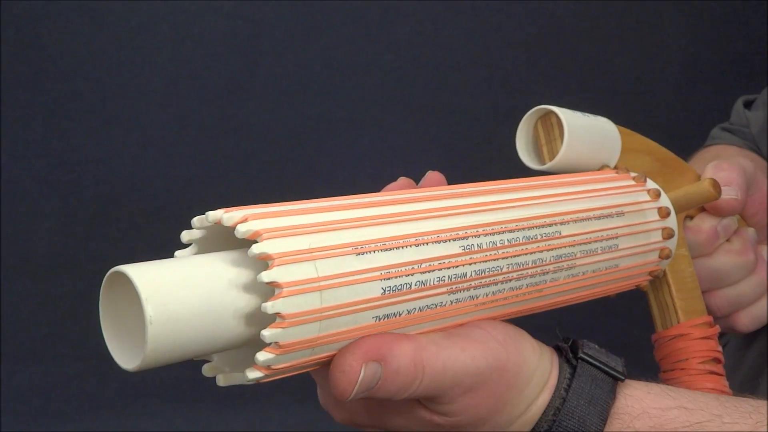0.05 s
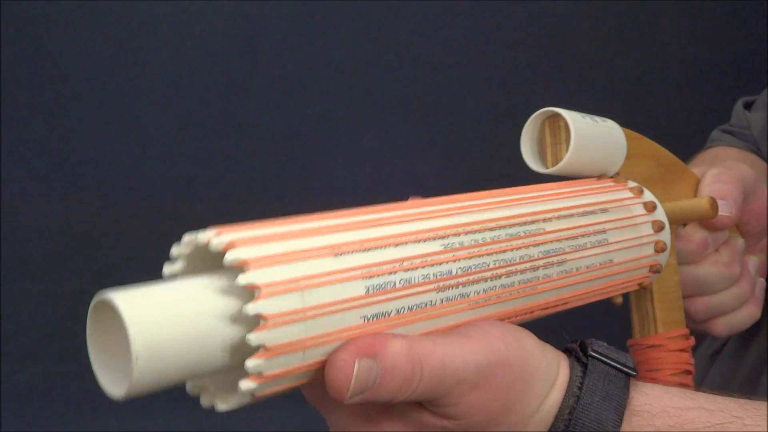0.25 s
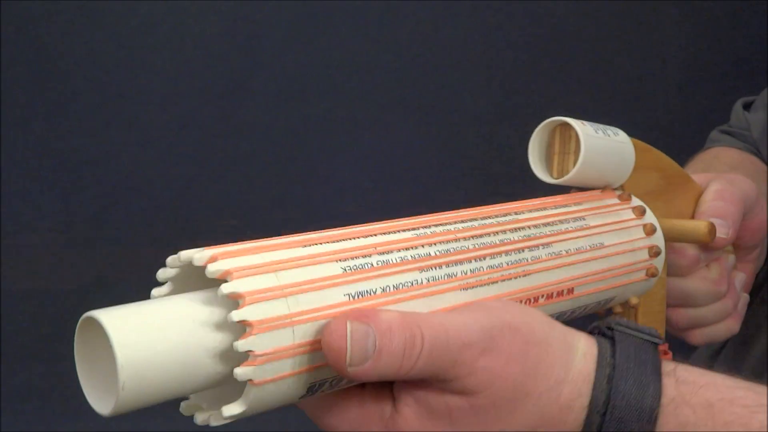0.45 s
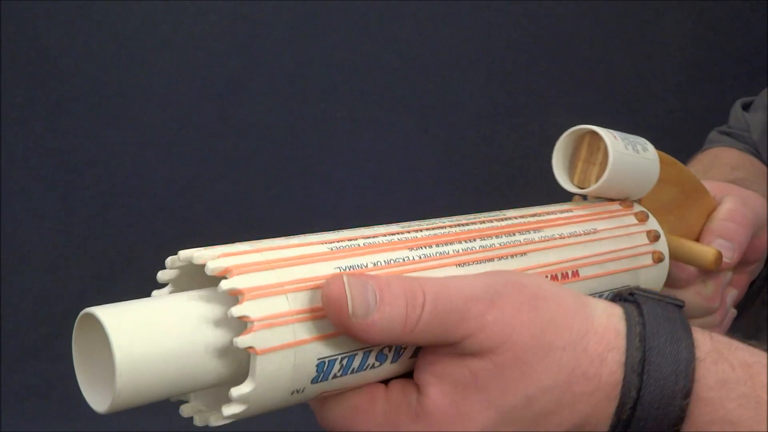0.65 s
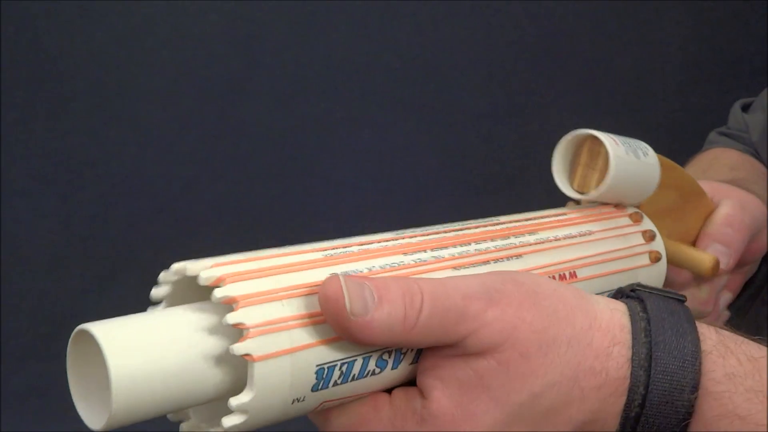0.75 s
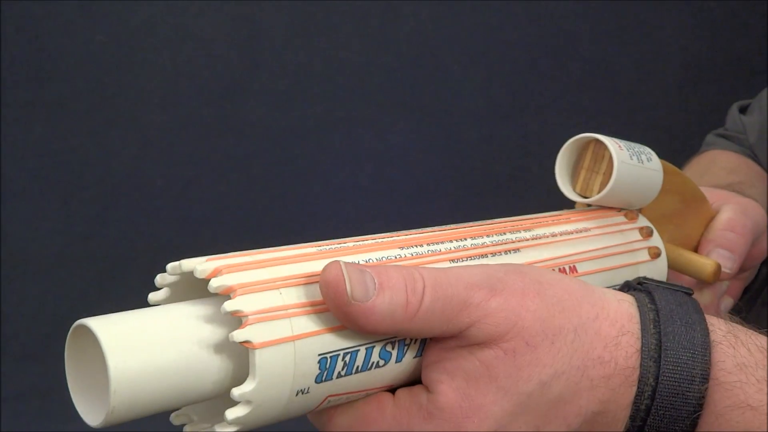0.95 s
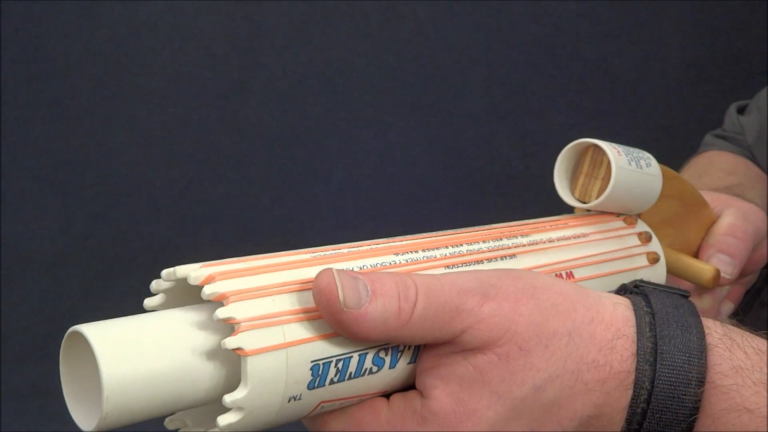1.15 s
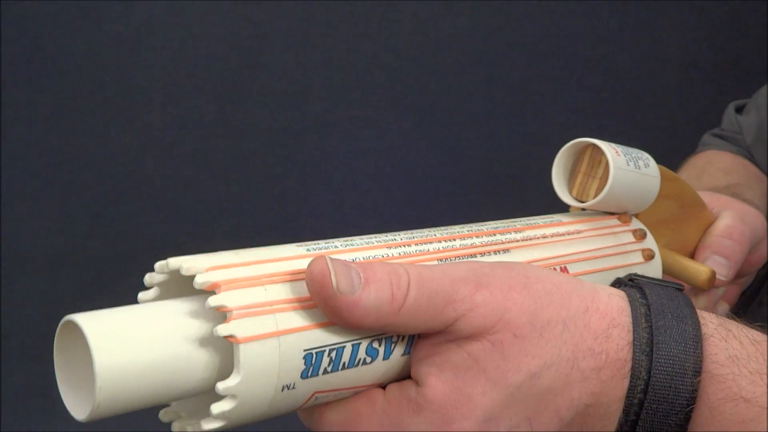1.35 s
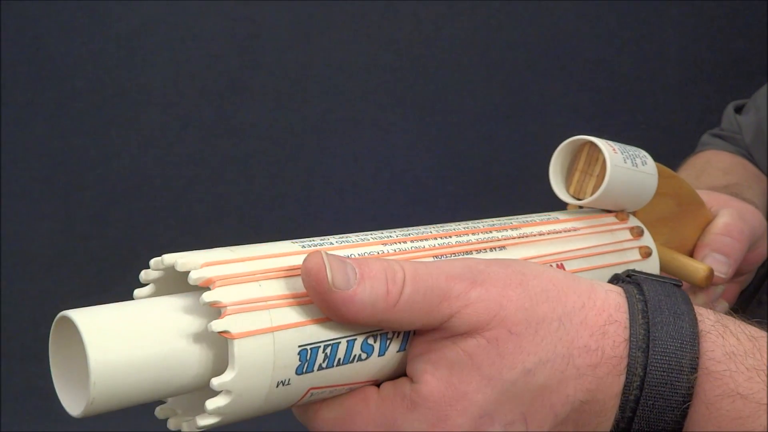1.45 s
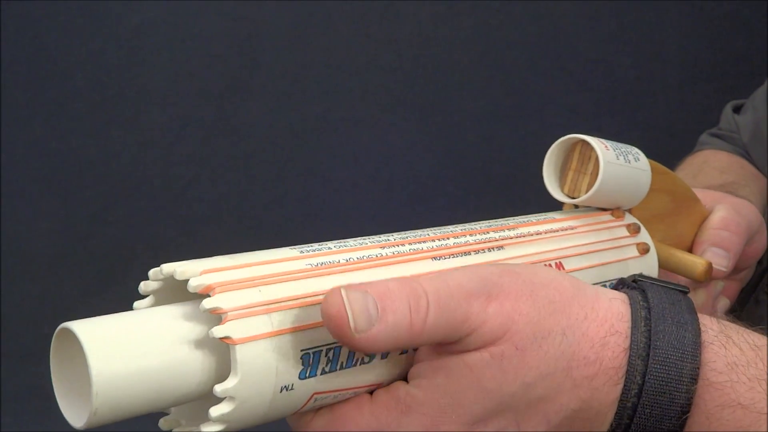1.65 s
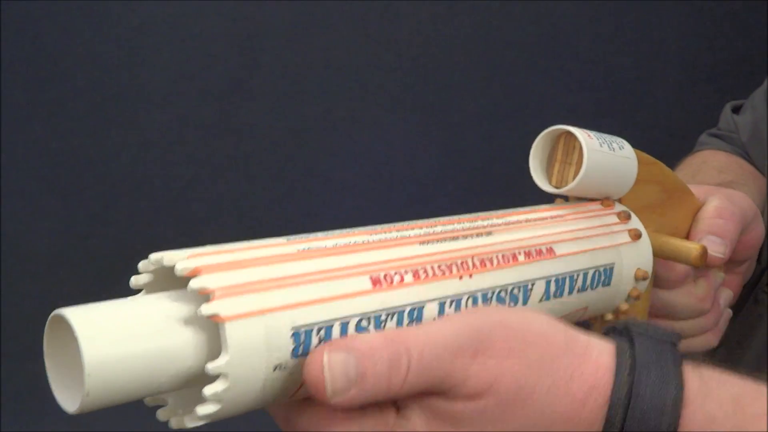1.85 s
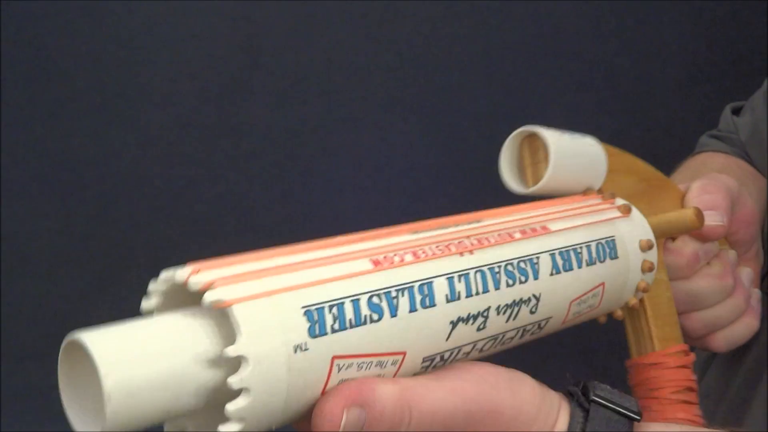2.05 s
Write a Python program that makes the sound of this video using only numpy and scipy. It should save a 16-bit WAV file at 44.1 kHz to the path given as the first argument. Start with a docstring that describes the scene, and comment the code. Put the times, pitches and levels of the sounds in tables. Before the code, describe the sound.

A toy gun fires five rubber bands between 0.2 and 0.7 seconds, each a sharp snap with a short fizzy tail, mixed with barrel clicks and soft slaps. Bands land with hollow knocks at about 0.85 and 1 second. A sixth snaps at 1.3 seconds and knocks at 1.5. Two light ticks and a faint hand rub follow around 1.7 to 1.8 seconds. The small room hums faintly throughout.

```python
"""A toy gun with a hand-twisted barrel lets go six rubber bands in a small, hard room whose air hums faintly.
First the pins tick past the catch and a hand rubs the barrel. Five bands snap off in quick succession, each
with a near echo and a swelling, fizzy tail, while soft things are slapped. From 0.85 s bands land on hard
things across the room with hollow knocks. The sixth leaves at 1.3 s; a knock, two ticks and a rub follow."""
import sys
import numpy as np
from scipy import signal
from scipy.fft import rfft, irfft, next_fast_len
from scipy.io import wavfile
from scipy.ndimage import uniform_filter1d

SR = 44100
rng = np.random.default_rng(int(sys.argv[2]) if len(sys.argv) > 2 else 0)


def generate_wav(signal):
    """Clip the signal to [-1, 1] and save it as 16-bit WAV at the path in sys.argv[1]."""
    frames = np.transpose(np.atleast_2d(signal))
    scaled = np.clip(frames, -1, 1) * 32767
    pcm = np.round(scaled).astype(np.int16)
    wavfile.write(sys.argv[1], SR, pcm)


N = 92610
T = np.arange(int(.8 * SR)) / SR  # seconds within one event

# Spectra of the sources. Each row: frequency in Hz, relative level in dB.
AIR_SPECTRUM = [(15, -37), (25, -9.5), (118, -9.5), (212, -8.5), (235, -7), (336, -4.5), (372, -10),
                (433, -3.5), (685, -15), (884, -5), (1110, -11), (1550, -12), (1670, -10), (3320, -21),
                (11000, -30), (14300, -70), (22000, -120)]
TICK_SPECTRUM = [(1000, -17), (2300, -21), (2850, -0.5), (3400, 1), (4500, -3), (5800, -1), (8000, -4.5),
                 (10500, -8.5)]
RUB_SPECTRUM = [(300, -4), (2000, -7), (3800, 3), (6000, -4.5), (11000, -12)]
RECOIL_SPECTRUM = [(20, -22), (45, -6), (90, -19), (190, -3), (300, -37), (1500, -71)]
TAIL_SPECTRUM = [(59, -44), (100, -24), (273, -18.5), (404, -13), (648, -17.5), (998, -12), (1260, -15),
                 (1700, -13.5), (2110, -13.5), (2470, -11), (3310, 0), (3800, -8.5), (4280, -1.5),
                 (4820, -1.5), (5750, -7.5), (7420, -2), (8690, -4), (10400, 0), (11000, -2), (14300, -28),
                 (22000, -120)]
SLAP_SPECTRUM = [(100, -6.5), (350, 0), (1000, 5), (2100, 3.5), (3500, 2), (11000, -16)]
CLATTER_SPECTRA = [
    [(150, -22), (380, 0), (520, -9.5), (720, 6.5), (1000, -4), (1500, -10), (3100, -12), (7000, -16),
     (11000, -37)],
    [(88, -78), (150, -37), (598, -3.5), (743, -1), (972, -19), (1210, -9.5), (2390, -10), (2610, -13.5),
     (2810, -3), (3480, -3.5), (11000, -22), (14300, -58), (22000, -120)],
    [(150, -20), (580, -20.5), (900, -1), (1150, -7.5), (1400, -10), (1800, -9.5), (2800, -14), (4800, -10),
     (7500, -16.5), (11000, -17.5)],
]  # one per hard landing
# Sharp clicks: pins passing the catch and, at 0.85 s, a band striking something hard. Each row: start
# in seconds, level in dB, room in dB re tick, tilt in dB per octave, ping in dB re tick.
SHARP_TICKS = [(0.1366, -42, -11, -7, -19), (0.2066, -19, -10, -2, 4.5), (.3203, -20.5, -17, -8, -12),
               (.3230, -15, -17.5, 2, -12), (.4208, -14.5, -15, -2, 0), (.533, -22, -8, -9, -7),
               (.633, -24, -10, -2, -10), (0.8077, -23.5, -9.5, -4, -2), (0.8513, -25, -11.5, -0.5, -16),
               (1.6755, -30, -14, 11, -12), (1.716, -44.5, -16, 0, -14)]
# Strokes of the hand. Each row: peak time in seconds, level in dB, width in seconds.
HAND_RUBS = [(0.208, -33.5, 0.012), (0.974, -45, 0.0097), (1.006, -42, 0.0096), (1.298, -49.5, 0.0095),
             (1.804, -53, .025)]
# Bands let go. Each row: start in seconds, snap in dB, echo in dB re snap, echo delay in seconds,
# tail in dB, tail build-up in seconds, recoil in dB, tilt in dB per octave.
RELEASES = [(0.2303, -17, 1.5, 0.0049, -11.5, 0.017, -62, -1),
            (0.3427, -14, -2, 0.0047, -12.5, 0.018, -51, 5), (0.4608, -12, -8, 0.0054, -12, 0.021, -59, -4),
            (0.5614, -14.5, 2, 0.0054, -12.5, 0.016, -57, 1.5),
            (0.6845, -13.5, -8, .0054, -13, 0.021, -57, 1),
            (1.3238, -16, 2, 0.0061, -12.5, 0.017, -52, 2.5)]
# Resonances of pins and barrel. Each row: frequency in Hz, bandwidth in Hz, level in dB.
BARREL_MODES = [(3210, 430, 3.5), (4800, 940, -2.5), (6930, 1400, -6.5), (7530, 800, -1.5),
                (10570, 500, 1.5)]
# Narrow resonances of the tube. Each row: frequency in Hz, relative level in dB.
TUBE_MODES = [(2987, -2.5), (3140, 2), (3315, 0.5), (3362, -8), (3462, -2), (3638, -7), (4397, -9),
              (4428, -3), (4515, -13), (4679, 2.5), (7181, -9), (10535, -5)]
# Bands hitting soft things. Each row: start in seconds, level in dB, rise in seconds.
SOFT_HITS = [(0.342, -30, 0.0019), (.385, -30.5, 0.0036), (.728, -26, 0.01), (.96, -38, 0.0095)]
# Bands hitting hard things. Each row: start in seconds, ring in dB, clatter in dB,
# clatter rise in seconds, clatter T60 in seconds.
HARD_HITS = [(0.8509, -26, -24.5, 0.007, 0.25), (1.0235, -39.5, -26.5, 0.0027, 0.26),
             (1.5018, -28, -21, .001, 0.25)]
# Modes of each hard thing. Each row: frequency in Hz, relative level in dB, T60 in seconds.
STRUCK_MODES = [
    [(362.6, -10.5, 0.28), (408, -9.5, 0.23), (669, -6.5, 0.2), (725, -8.5, 0.4), (800, 10, 0.028),
     (842, 0.5, 0.067), (963, -10.5, 0.24)],
    [(510, -5, 0.47), (590, -1.5, 0.38), (690, -22, 0.45), (755, -3.5, 0.3), (1157, -9, 0.44),
     (2810, -2, .25), (2980, -8, 0.27), (3300, -1, 0.32)],
    [(189, -8.5, 0.65), (684, -12.5, 0.4), (874, -3.5, 0.29), (926, -5.5, 0.29), (1067, -13, 0.54),
     (1109, -0.5, 0.28), (1770, -1.5, 0.18), (2127, -8, 0.28), (2360, 2, 0.073)],
]
# Reverberation of the room. Each row: frequency in Hz, T60 in seconds.
ROOM_T60 = [(200, 0.58), (1000, 0.57), (3300, 0.37), (6000, 0.32), (10500, 0.22)]
# Likeness of left and right. Each row: frequency in Hz, coherence from 0 to 1.
COHERENCE = [(40, 0.9), (120, .9), (300, 0.55), (600, 0.65), (1200, 0.61), (4000, 0.73), (10000, 0.69)]

AIR_DB, TOP_HZ = -49.5, 11080
TICK_HOLD_S, TICK_FALL_S, TICK_ECHO_S, TICK_ECHO_DB = 0.001, 0.00049, 0.0047, -12
PING_HZ, PING_T60_S = 3260, 0.016
SNAP_HOLD_S, ECHO_HOLD_S, SNAP_LOW_HZ = 0.0011, 0.0006, 2800
TUBE_DB, TUBE_T60_S = -20, 0.35
SWELL_DB, SWELL_SHAPE, TAIL_ONSET_S = 11, 1.24, 0.009
RING_RISE_CYCLES = 1.3
GUN_PAN_DB, TAIL_PAN_DB, LANDING_PAN_DB = -0.7, 0.14, 0.5  # left gain, right the opposite


def amp(db):
    """Amplitude ratio of a level in decibels."""
    return 10 ** (np.asarray(db) / 20)


def unit(x):
    """Normalisation to rms 1."""
    return x / np.sqrt(np.mean(x ** 2) + 1e-20)


def along(points, hz):
    """Interpolation of (Hz, value) points on a logarithmic frequency axis."""
    freqs, values = np.transpose(points)
    return np.interp(np.log(hz + 1), np.log(freqs + 1), values)


def filtered(x, response):
    """Linear filtering: the spectrum is multiplied by a frequency response."""
    n = x.shape[-1]
    padded = next_fast_len(n + 8192)
    return irfft(rfft(x, padded) * response(np.fft.rfftfreq(padded, 1 / SR)), padded)[..., :n]


def add(out, start, x, pan_db=0):
    """Superposition: x joins the track at start seconds, placed by a level difference."""
    i = max(round(start * SR), 0)
    out[:, i:i + x.shape[-1]] += (x * amp([[pan_db], [-pan_db]]))[:, :N - i]


def noise(spectrum, size, grain_db=0, side_db=0):
    """Partly coherent stereo noise of rms 1; amplitude modulation gives it millisecond grains."""
    def response(hz):
        angle = np.arccos(np.clip(along(COHERENCE, hz), 0, .999)) / 2
        return amp(along(spectrum, hz)) * [np.cos(angle), amp(side_db) * np.sin(angle)]

    grains = unit(uniform_filter1d(rng.standard_normal(size), size=40))
    mid, side = filtered(rng.standard_normal((2, size)) * amp(grain_db * grains), response)
    return unit(np.array([mid + side, mid - side]))


def fade(t60):
    """Exponential decay, 60 dB in t60 seconds."""
    return np.exp(-np.log(1000) * T / t60)


def rise(seconds):
    """Exponential approach to 1 with the given time constant."""
    return 1 - np.exp(-T / seconds)


def ring(hz, t60):
    """Free vibration of one damped mode, its random phase a little different at each ear."""
    phase = rng.uniform(0, 2 * np.pi) + rng.normal(0, 0.21, (2, 1))
    return np.sin(2 * np.pi * hz * T + phase) * fade(t60)


def room_air():
    """Stationary noise, strongest at low frequencies, is heard as a faint hum."""
    return amp(AIR_DB) * noise(AIR_SPECTRUM, N)


def slip(hold_s, fall_s, side_db):
    """Slipping contact excites with a brief train of equal kicks of random sign."""
    mid, side = np.sign(rng.standard_normal((2, len(T)))) * amp([[0], [side_db]])
    envelope = rise(0.00018) * np.exp(-np.maximum(T - hold_s, 0) / fall_s)
    return envelope * np.array([mid + side, mid - side])


def click(x, tilt_db):
    """Spectral tilt in dB per octave sets brightness; the energy is that of rms 1 over 2 ms."""
    x = filtered(x, lambda hz: amp(tilt_db * np.log2(np.clip(hz, 2500, TOP_HZ) / 5000)) * (hz < TOP_HZ))
    return x / np.sqrt(np.sum(x ** 2) / (2 * .002 * SR))


def ticks():
    """Impulsive excitation: a light contact clicks and pings, with a weak echo and a little room."""
    out = np.zeros((2, N))
    for start, db, room_db, tilt_db, ping_db in SHARP_TICKS:
        kicks = slip(TICK_HOLD_S, TICK_FALL_S, side_db=-14)
        contact = filtered(kicks, lambda hz: amp(along(TICK_SPECTRUM, hz)))
        ping = amp(ping_db) * ring(PING_HZ, PING_T60_S) * rise(TICK_FALL_S)
        tick = amp(db) * (click(contact, tilt_db) + ping)
        add(out, start, tick, GUN_PAN_DB)
        add(out, start + TICK_ECHO_S, amp(TICK_ECHO_DB) * tick, GUN_PAN_DB)
        add(out, start, amp(db + room_db) * fade(0.15) * noise(TAIL_SPECTRUM, len(T), grain_db=2))
    return out


def hand_rubs():
    """Friction of skin on plastic makes grainy noise in short, bell-shaped strokes."""
    t = np.arange(N) / SR
    strokes = sum(amp(db) * np.exp(-((t - peak) / width) ** 2 / 2) for peak, db, width in HAND_RUBS)
    return strokes * noise(RUB_SPECTRUM, N, grain_db=2)


def barrel_response(hz):
    """Modal summation: pins and barrel act as parallel resonators of alternating sign."""
    return sum((-1) ** k * amp(db) * 1j * hz * width / (centre ** 2 - hz ** 2 + 1j * hz * width)
               for k, (centre, width, db) in enumerate(BARREL_MODES))


def snap(hold_s, tilt_db):
    """Resonance: the slipping band rings the barrel, which radiates little below its first mode."""
    ringing = filtered(slip(hold_s, fall_s=0.00031, side_db=-22), barrel_response)
    low_cut = signal.butter(4, SNAP_LOW_HZ, "high", fs=SR, output="sos")
    return click(signal.sosfilt(low_cut, ringing), tilt_db)


def room_decay(x):
    """Absorption: each frequency dies away with its own reverberation time."""
    hz, t, spectra = signal.stft(x, SR, nperseg=256)
    decay = amp(-60 * t / along(ROOM_T60, hz)[:, None])
    return signal.istft(spectra * decay, SR)[1][:, :len(T)]


def tail(build_s):
    """Amplitude envelope: a fizzy, ringing tail swells after each snap, then dies away."""
    tube = sum(amp(db + rng.normal(0, 1.16)) * ring(hz, TUBE_T60_S) for hz, db in TUBE_MODES)
    fizz = room_decay(noise(TAIL_SPECTRUM, len(T), grain_db=1, side_db=-4.5))
    swell = amp(-SWELL_DB * np.exp(-(T / build_s) ** SWELL_SHAPE)) * np.sqrt(rise(TAIL_ONSET_S))
    return swell * (fizz + amp(TUBE_DB) * tube)


def shots():
    """Sudden release of tension gives a snap, its near reflection, a recoil thump and a tail."""
    out = np.zeros((2, N))
    for start, db, echo_db, echo_s, tail_db, build_s, recoil_db, tilt_db in RELEASES:
        add(out, start, amp(db) * snap(SNAP_HOLD_S, tilt_db), GUN_PAN_DB)
        add(out, start + echo_s, amp(db + echo_db) * snap(ECHO_HOLD_S, tilt_db), GUN_PAN_DB)
        add(out, start, amp(recoil_db) * noise(RECOIL_SPECTRUM, len(T)) * fade(0.46) * rise(0.0028))
        add(out, start, amp(tail_db) * tail(build_s), TAIL_PAN_DB)
    return out


def soft_landings():
    """Damped impact: a band slaps a soft thing, giving a burst of noise without a ring."""
    out = np.zeros((2, N))
    for start, db, rise_s in SOFT_HITS:
        envelope = fade(0.26) * (1 - np.exp(-(T / rise_s) ** 2))
        add(out, start, amp(db) * envelope * noise(SLAP_SPECTRUM, len(T), grain_db=1.5), LANDING_PAN_DB)
    return out


def hard_landings():
    """Impact excites the normal modes of a hard thing: a hollow knock with a noisy clatter."""
    out = np.zeros((2, N))
    for hit, modes, spectrum in zip(HARD_HITS, STRUCK_MODES, CLATTER_SPECTRA):
        start, ring_db, clatter_db, rise_s, clatter_t60 = hit
        body = sum(amp(db) * ring(hz, t60) * rise(RING_RISE_CYCLES / hz) for hz, db, t60 in modes)
        clatter = noise(spectrum, len(T), grain_db=1.5) * fade(clatter_t60) * rise(rise_s)
        add(out, start, amp(ring_db) * body + amp(clatter_db) * clatter, LANDING_PAN_DB)
    return out


def scene():
    """Superposition: the pressures of gun, landings, hand and air add."""
    return shots() + ticks() + hard_landings() + soft_landings() + hand_rubs() + room_air()


def record(dry):
    """Soft saturation rounds the peaks, and a steep low-pass limits the bandwidth."""
    rounded = dry / (1 + np.abs(dry / .55) ** 4) ** (1 / 4)
    return filtered(rounded, lambda hz: 1 / (1 + (hz / TOP_HZ) ** 170))


dry = scene()
out = record(dry)
generate_wav(out)
```